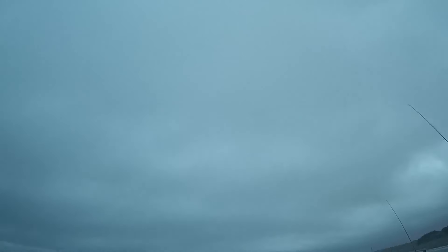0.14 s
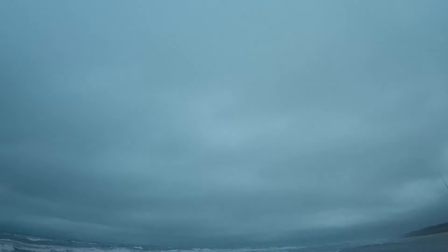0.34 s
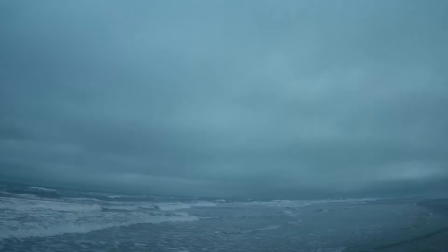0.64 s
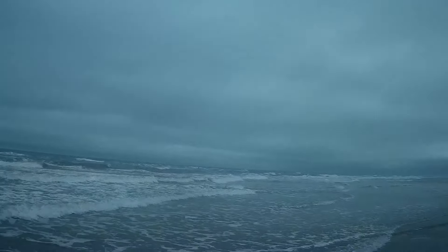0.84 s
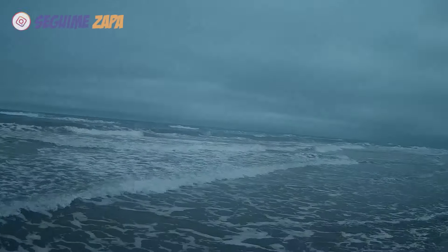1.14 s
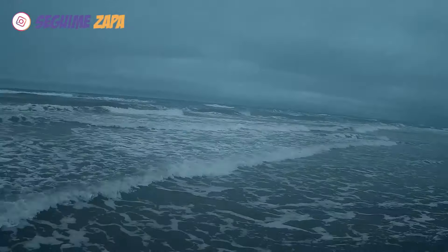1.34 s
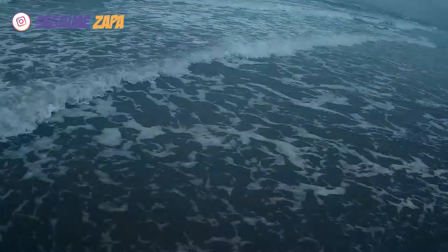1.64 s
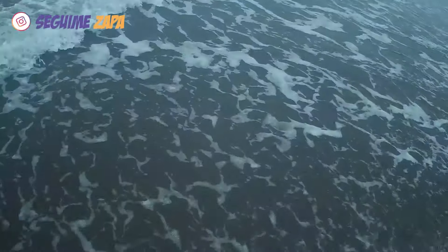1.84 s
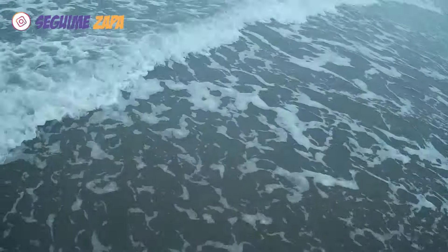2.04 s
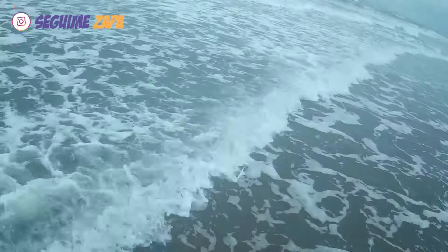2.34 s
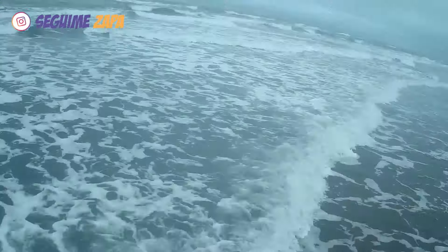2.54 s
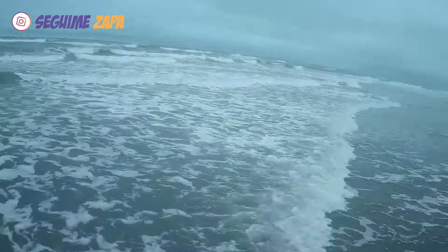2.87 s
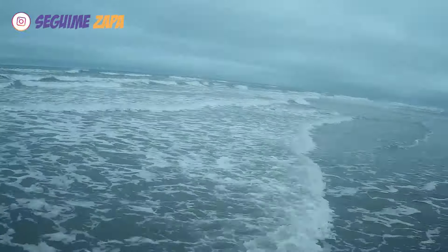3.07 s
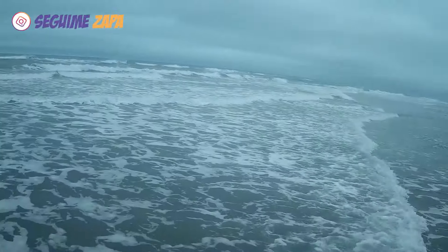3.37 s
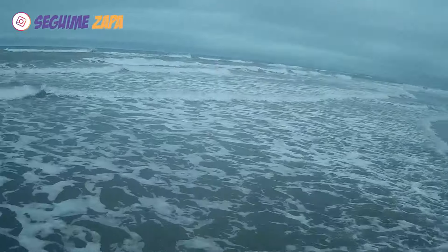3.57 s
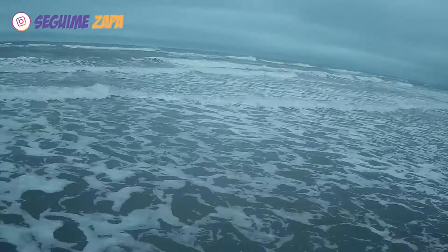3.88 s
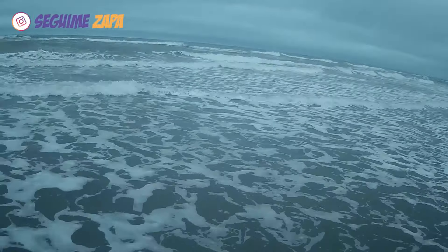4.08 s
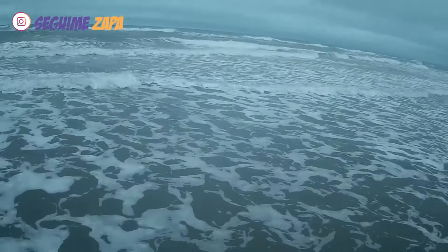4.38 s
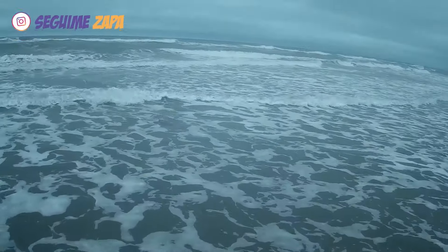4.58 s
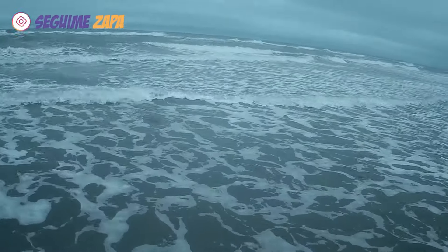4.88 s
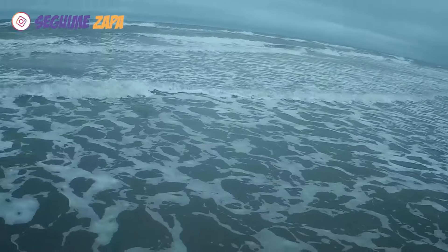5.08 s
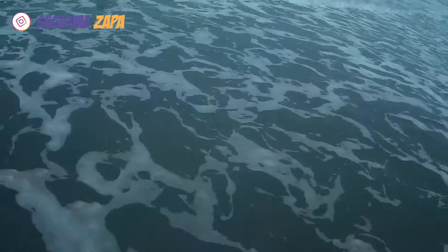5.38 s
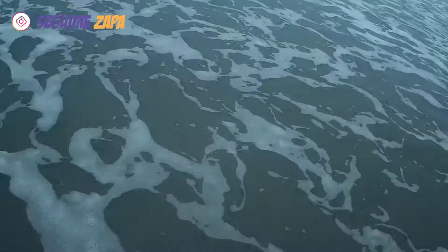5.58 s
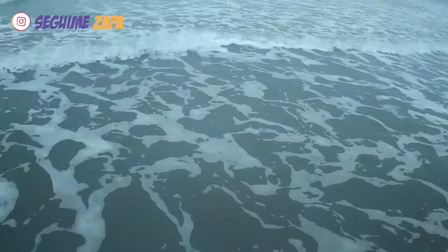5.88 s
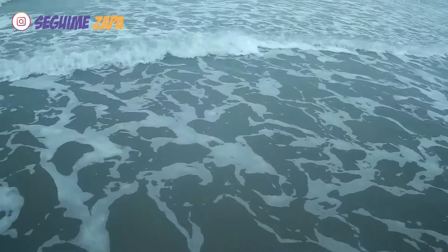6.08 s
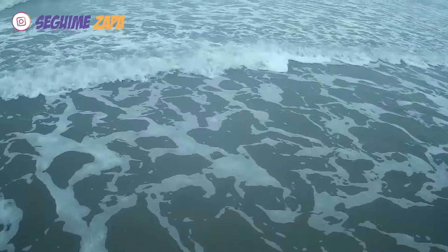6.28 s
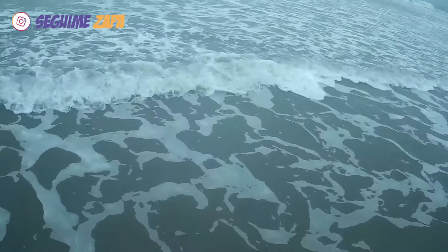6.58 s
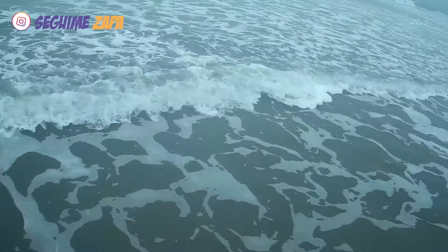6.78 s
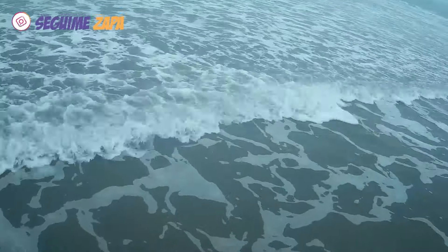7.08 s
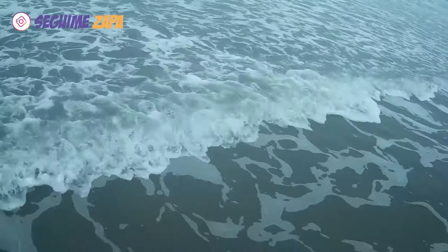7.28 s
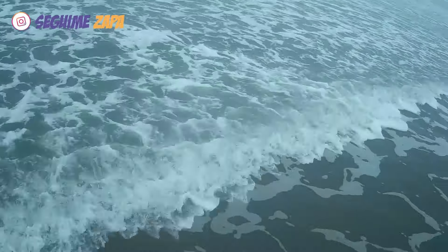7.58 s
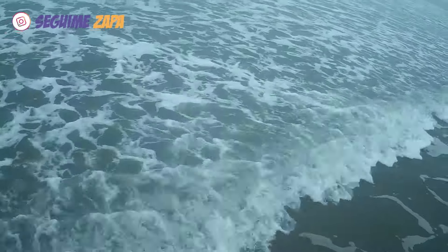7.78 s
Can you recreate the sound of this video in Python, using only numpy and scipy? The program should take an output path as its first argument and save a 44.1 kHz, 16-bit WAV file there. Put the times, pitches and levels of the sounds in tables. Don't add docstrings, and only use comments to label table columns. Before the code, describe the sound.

Line pulls off a clicking fishing reel, first in halting ticks and short runs, finally a fast bright whirr, with surf wash and gusty wind behind.

```python
import sys
import numpy as np
from scipy import signal
from scipy.fft import rfft, irfft
from scipy.io import wavfile

SR = 44100
rng = np.random.default_rng(int(sys.argv[2]) if len(sys.argv) > 2 else 0)


def decibels_to_gain(level_db):
    exponent = np.asarray(level_db, float) / 20
    return 10 ** exponent


def to_wav(s):
    ch = np.atleast_2d(s).T
    pcm = np.round(np.clip(ch, -1, 1) * 32767)
    wavfile.write(sys.argv[1], SR, pcm.astype(np.int16))


N = 349272


def evened(x):
    return x / np.sqrt(np.mean(x ** 2) + 1e-20)


def read_spectrum(points, hz):
    point_hz, value = np.transpose(points)
    return np.interp(np.log(hz + 1), np.log(point_hz + 1), value)


def tint(x, spectrum):
    length = x.shape[-1]
    hz = np.fft.rfftfreq(length, 1 / SR)
    return irfft(rfft(x) * decibels_to_gain(read_spectrum(spectrum, hz)), length)


def coloured(spectrum):
    return evened(tint(rng.standard_normal(N), spectrum))


def curve(rows):
    time_s, level_db = np.transpose(rows)
    return np.interp(np.arange(N) / SR, time_s, level_db)


def lumps(per_s):
    t = np.arange(N) / SR
    rates_hz = np.geomspace(per_s / 8, per_s, num=16)
    return evened(sum(np.sin(2 * np.pi * (f * t + rng.random())) / np.sqrt(f) for f in rates_hz))


# pitch_hz, level_db
HISS = [(2500, -8), (5100, -8), (6800, -6), (8400, 0), (9500, -5), (11300, -13), (15200, -18)]


def hiss():
    return decibels_to_gain(-68.5) * coloured(HISS)


def breaker(crest_s):
    lift_db, build_s, drain_s = 7, 0.1, 0.33
    t = np.arange(N) / SR - crest_s
    return lift_db * np.exp(-(t / np.where(t < 0, build_s, drain_s)) ** 2)


# time_s, level_db
SHORE = [(0, -39), (.07, -36.5), (.3, -36), (.95, -39), (1.2, -37.5), (1.45, -35), (2.05, -38), (2.6, -38),
         (3.9, -39.5), (4.55, -40.5), (4.65, -39.5), (4.82, -42.5), (5.6, -34.5), (5.9, -35), (6.33, -38.5),
         (6.95, -33.5), (7.3, -36), (7.92, -37)]
# pitch_hz, level_db_per_hz
WASH = [(100, -11.5), (250, -1), (500, -2), (900, -6.5), (1200, -11), (1601, -33.5), (2300, -27),
        (4001, -80)]
# pitch_hz, level_db
SPRAY = [(700, -20), (1300, 0), (1800, -7), (2500, -19), (3200, -25), (4500, -36), (7000, -55)]
# pitch_hz, level_db
FIZZ = [(1500, -14), (2200, 0), (3000, -4), (3900, -7), (4400, -19), (6000, -26), (8000, -45)]


def surf():
    calm_db, crest_s, body_lag_s = -37, 0.5, 0.04
    wave_db = curve(SHORE) - calm_db
    wash_db = -35.5 + wave_db + breaker(crest_s + body_lag_s) + 0.93 * lumps(per_s=18)
    rush_db = -50.5 + 0.85 * wave_db + 1.43 * breaker(crest_s)
    fizz_db = -61.0 + 1.33 * (rush_db + 47.5)
    wash = decibels_to_gain(wash_db) * coloured(WASH)
    rush = decibels_to_gain(rush_db + 1.5) * coloured(SPRAY)
    return wash + rush + decibels_to_gain(fizz_db) * coloured(FIZZ)


# time_s, level_db
GUSTS = [(0.0, -38.5), (0.2, -36), (0.26, -39.5), (0.7, -35.5), (0.88, -44.5), (1.85, -31.5), (2.27, -38),
         (2.47, -31), (3.04, -43), (4.68, -42), (4.81, -47), (5.71, -31), (6.26, -39.5), (6.46, -32.5),
         (6.68, -40.5), (6.95, -35.5), (7.7, -40), (7.92, -32)]
# pitch_hz, level_db
WIND = [(40, -22), (70, -3.5), (110, -3), (160, -4), (240, -8.5), (400, -15.5), (800, -63.5)]
# pitch_hz, level_db
BOOM = [(12, -7.5), (28, 12), (50, 13.5), (80, -4), (150, -37.5)]


def wind():
    calm_db = -38
    gust_db = curve(GUSTS) - calm_db
    buffet_db = -36.5 + 1.03 * gust_db + 1.23 * lumps(per_s=12)
    boom_db = -47.0 + 0.3 * gust_db + 1.5 * lumps(per_s=5.4)
    return decibels_to_gain(buffet_db) * coloured(WIND) + decibels_to_gain(boom_db) * coloured(BOOM)


# pitch_hz, t60_s
ECHO = [(2000, 0.04), (3400, 0.19), (4350, 0.25), (5000, 0.31), (8000, 0.11), (15000, 0.21)]
# pitch_hz, level_db
ECHO_COLOUR = [(2000, -1), (4300, -5), (6000, 1.5), (9000, 8), (12500, 9), (15500, 1)]


def echoes(x):
    gap_s, onset_s = 0.011, 0.0022
    hz, t, z = signal.stft(rng.standard_normal(SR // 2), SR, nperseg=128)
    decay = decibels_to_gain(-60 * t / read_spectrum(ECHO, hz)[:, None])
    tail = signal.istft(z * decay, SR, nperseg=128)[1]
    tail *= np.clip((np.arange(len(tail)) / SR - gap_s) / onset_s, 0, 1)
    response = tint(tail, ECHO_COLOUR) / np.linalg.norm(tail)
    return signal.fftconvolve(x, response)[:N]


def turn(pull):
    s, teeth = np.transpose(pull)
    tooth = np.arange(teeth[-1] + 1)
    row = np.minimum(np.searchsorted(teeth, tooth, "right") - 1, len(s) - 2)
    span, step = np.diff(teeth)[row], np.diff(s)[row]
    slope = np.gradient(s, teeth)
    u = (tooth - teeth[row]) / span
    bend = (1 - u) * (span * slope[row] - step) - u * (span * slope[row + 1] - step)
    return s[row] + u * step + u * (1 - u) * bend


# misplacement_teeth, body_db, bell_db, ring_db, rim_db, treble_db
TEETH = [(-0.03, 0.7, 3.6, 0.9, -1.4, -0.4), (-0.0, 2.6, 0.1, 2.4, 0.6, -1.3),
         (-0.02, 3.2, 1.1, 1.5, -1.0, -0.5), (0.0, 3.8, 1.2, 1.9, -1.9, 0.0),
         (0.01, 4.8, -1.1, 3.1, -0.5, 0.0), (-0.02, 2.7, -3.0, -0.2, 1.1, 1.1),
         (-0.0, 2.0, -1.4, -0.9, 1.2, 1.3), (0.01, 0.1, -1.7, -1.7, 2.9, 0.8),
         (0.01, -2.8, -2.9, -3.8, 1.8, -0.3), (0.02, -5.0, -2.1, -3.4, 1.2, -0.4),
         (0.02, -4.6, -0.4, 0.2, 0.9, 1.1), (0.02, -3.8, 0.1, 0.4, 0.4, -0.4),
         (0.01, -2.7, 2.6, -0.1, -2.5, -0.7), (-0.02, -1.0, 3.8, -0.4, -2.8, -0.4)]
# time_s, bell_db, ring_db, rim_db (dB off the tooth's habit)
CREEP = [(1.8013, -1, 3, 2), (1.8421, -4, 4, 6), (1.9002, 1, 1, 1), (1.9761, 4, -1, 0), (2.0966, 2, 1, 1),
         (2.378, 0, 3, 2), (2.7106, 2, 1, 3), (3.0593, 2, 1, 2), (3.2866, 1, 2, 0), (3.4316, 1, 2, 4),
         (3.5085, 1, 2, 5), (3.5541, 5, 1, 3), (4.1467, 2, 2, 1), (4.2067, 0, 1, 3), (4.3038, 0, 2, 4),
         (4.3859, 3, 3, 5), (4.4331, 4, 2, 7), (4.4752, -1, 0, 5), (4.5056, -1, 4, 3), (4.5345, -2, 3, 6),
         (4.5663, 4, -2, 3), (4.6066, 4, -1, -1), (4.6675, 2, 1, 2), (4.7502, -2, 3, 2), (4.7909, 1, -1, 4),
         (4.8344, 3, 2, 0), (5.632, 2, -2, 1), (5.6565, 3, -2, 3), (5.6815, -2, 2, 0), (5.6969, 1, 1, 2)]
# time_s, teeth_passed
FIRST_PULL = [
    (1.246, 0),
    (1.284, 1),
    (1.3077, 2),
    (1.4471, 10),
    (1.4642, 11),
    (1.5135, 14),
    (1.5908, 18),
    (1.7269, 23),
    (1.7589, 24),
]
# time_s, teeth_passed
SECOND_PULL = [
    (3.5831, 0),
    (3.6219, 2),
    (3.7011, 8),
    (3.7215, 10),
    (3.7827, 16),
    (3.8552, 23),
    (3.911, 27),
    (4.0818, 36),
    (4.111, 37),
]
# time_s, teeth_passed
SLOW_DRAW = [
    (4.865, 0),
    (4.8981, 1),
    (4.9242, 2),
    (4.9825, 4),
    (5.0282, 6),
    (5.0528, 7),
    (5.1445, 10),
    (5.2631, 14),
    (5.2896, 15),
]
# time_s, teeth_passed
QUICKENING = [
    (5.3127, 0),
    (5.4617, 7),
    (5.4938, 9),
    (5.5546, 14),
    (5.5963, 18),
    (5.6066, 19),
    (5.6178, 20),
]
# time_s, teeth_passed
FIRST_RUN = [
    (5.7076, 0),
    (5.7228, 2),
    (5.7549, 8),
    (5.9425, 46),
    (6.0488, 63),
    (6.0817, 68),
    (6.1102, 71),
]
# time_s, teeth_passed
SECOND_RUN = [
    (6.1212, 0),
    (6.1481, 3),
    (6.1909, 10),
    (6.2951, 28),
    (6.3517, 37),
    (6.423, 47),
    (6.4561, 50),
    (6.5573, 63),
    (6.5999, 67),
]
# time_s, teeth_passed
THIRD_RUN = [
    (6.6106, 0),
    (6.6306, 2),
    (6.7521, 23),
    (6.8361, 40),
    (6.9128, 53),
    (6.9505, 60),
    (6.9644, 62),
]
# time_s, teeth_passed
FOURTH_RUN = [
    (6.972, 0),
    (6.9794, 1),
    (7.0848, 19),
    (7.2131, 41),
    (7.2552, 51),
    (7.3892, 82),
    (7.4357, 87),
]
# time_s, teeth_passed
LAST_RUN = [
    (7.4466, 0),
    (7.4765, 3),
    (7.5689, 19),
    (7.6114, 26),
    (7.6953, 44),
    (7.7457, 53),
    (7.7816, 60),
    (7.8734, 73),
    (7.9169, 82),
]


def snap_times():
    free_run_s = 5.71
    pulls = [FIRST_PULL, SECOND_PULL, SLOW_DRAW, QUICKENING,
             FIRST_RUN, SECOND_RUN, THIRD_RUN, FOURTH_RUN, LAST_RUN]
    times = np.sort(np.concatenate([np.transpose(CREEP)[0], *map(turn, pulls)]))
    misplaced = np.array(TEETH)[np.arange(len(times)) % len(TEETH), 0]
    return times + misplaced * np.gradient(times) * (times > free_run_s)


# pitch_hz, level_db_per_hz
CRACK = [(3000, -10), (5350, -9), (5800, -7), (6900, 0.5), (7230, -10), (7500, -1), (8750, -11),
         (9500, -4.5), (10650, -11), (11650, -6), (11950, -17), (13000, -6), (14000, -0.5), (14400, -23),
         (15400, -9.5)]


def pawl_crack(t, count):
    rise = (1 - np.exp(-t / 0.0004)) ** 3
    burst = rise * (decibels_to_gain(-60 * t / 0.004) + decibels_to_gain(-8 - 60 * t / 0.013))
    return tint(burst * rng.standard_normal((count, len(t))), CRACK)


def spool_mode(t, mode, facing_db, lead_s):
    rise_s, slip_turns, detune = 0.00067, 0.11, 0.0084
    hz, db, t60_s = mode
    count = len(facing_db)
    chance = rng.standard_normal((count, 3))
    sway = np.cos(2 * np.pi * (np.arange(count) / len(TEETH) + rng.random()))
    pitch_hz = hz * (1 + detune * chance[:, 2]) + 25 * sway
    phase_turns = slip_turns * chance[:, 1] + 0.05 * sway
    turns = np.outer(pitch_hz, t - lead_s) + phase_turns[:, None]
    swell = (1 - np.exp(-t / rise_s)) ** 3 * decibels_to_gain(-60 * t / t60_s)
    level = decibels_to_gain(db + facing_db + 3.0 * chance[:, 0])
    return level[:, None] * swell * np.cos(2 * np.pi * turns)


# pitch_hz, level_db, t60_s
BODY = [(2000, -25, 0.017), (1850, -39.5, 0.028), (2250, -32.5, 0.0079), (3880, -16, 0.0065)]
# pitch_hz, level_db, t60_s
BELL = [(3395, -16, 0.014), (3794, 0.5, 0.0042)]
# pitch_hz, level_db, t60_s
RING = [(4140, -8.5, 0.0057), (4286, -3.5, 0.0083)]
# pitch_hz, level_db, t60_s
RIM = [(4730, -14.5, 0.008), (4895, -29, 0.017)]
# pitch_hz, level_db, t60_s
TIP = [(7550, -43, 0.016), (12400, -31, 0.014), (13900, -32, .012), (15450, -41, .016)]
# pitch_hz, level_db, t60_s
KNOCK = [(1410, -32, 0.015), (2330, -33, 0.012), (2580, -40, 0.028)]
# body_db, bell_db, ring_db, rim_db
LOADED_DB = (-0.82, .5, 0.76, 3)


def reel():
    lead_s, ring_samples, scatter_db, loaded_per_s = 0.0011, 900, 0.37, 108
    haste_db, knock_haste_db = -0.86, -2.5
    times = snap_times()
    gap_s = np.gradient(times)
    teeth_db = np.array(TEETH)[np.arange(len(times)) % len(TEETH), 1:]

    off_db = scatter_db * rng.standard_normal(teeth_db.shape)
    slowness = np.clip(np.log2(loaded_per_s * gap_s), 0, 2)
    off_db[:, :4] += np.outer(slowness, LOADED_DB)
    lone = np.searchsorted(times, np.transpose(CREEP)[0])
    off_db[lone, 1:4] = np.array(CREEP)[:, 1:]
    facing_db = teeth_db + off_db
    facing_db[:, 4] += 0.42 * teeth_db[:, 0]

    haste = np.log2(np.clip(1 / gap_s, 30, 400) / 60)
    knock_db = knock_haste_db * haste - 0.77 * facing_db[:, 0]

    t = np.arange(ring_samples) / SR
    snaps = np.zeros((len(times), ring_samples))
    for modes, group_db in zip([BODY, BELL, RING, RIM, TIP, KNOCK], [*facing_db.T, knock_db]):
        for mode in modes:
            snaps += spool_mode(t, mode, group_db, lead_s)
    crack_db = -7.5 + 0.7 * teeth_db[:, 4:] + haste_db * haste[:, None]
    snaps += decibels_to_gain(crack_db) * pawl_crack(t, len(times))

    out = np.zeros(N + ring_samples)
    starts = np.round((times - lead_s) * SR).astype(int)
    np.add.at(out, starts[:, None] + np.arange(ring_samples), snaps)
    return out[:N]


def scene():
    clicks = reel()
    reflected = decibels_to_gain(-19.5) * echoes(clicks)
    return (clicks + reflected + surf() + wind() + hiss())[None]


def top_cut(x):
    return signal.sosfilt(signal.butter(12, 16810, fs=SR, output="sos"), x)


# pitch_hz, level_db
EDGE = [(15430, 0), (15520, -10), (15850, -17), (15950, -29), (16400, -30), (16800, -40)]


def record(dry):
    ceiling = 0.62
    rounded = ceiling * np.tanh(dry / ceiling)
    return top_cut(tint(rounded, EDGE))


dry = scene()
out = record(dry)
to_wav(out)
```